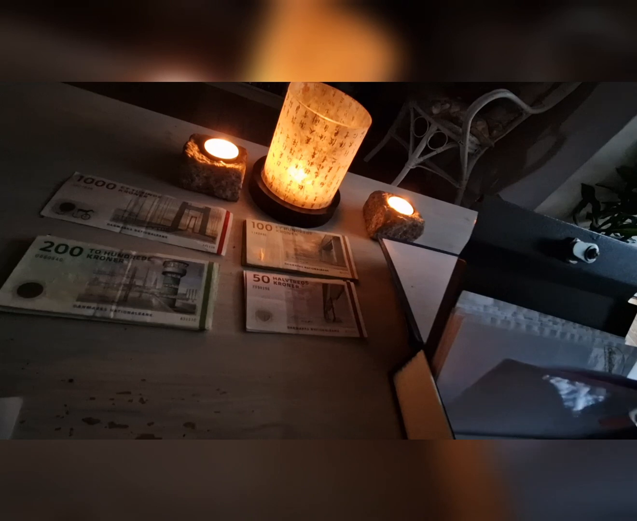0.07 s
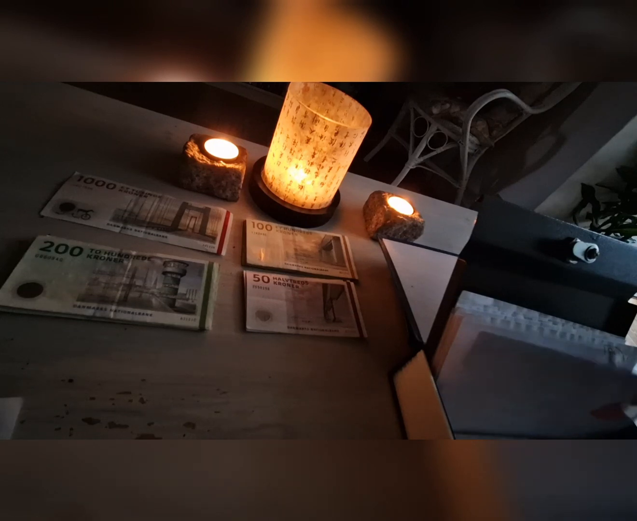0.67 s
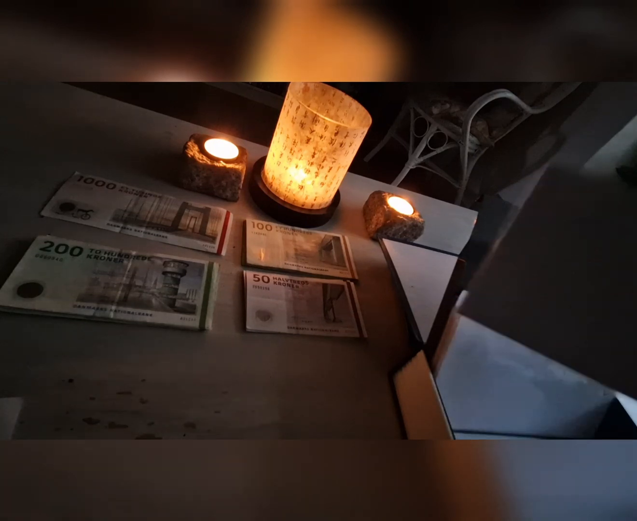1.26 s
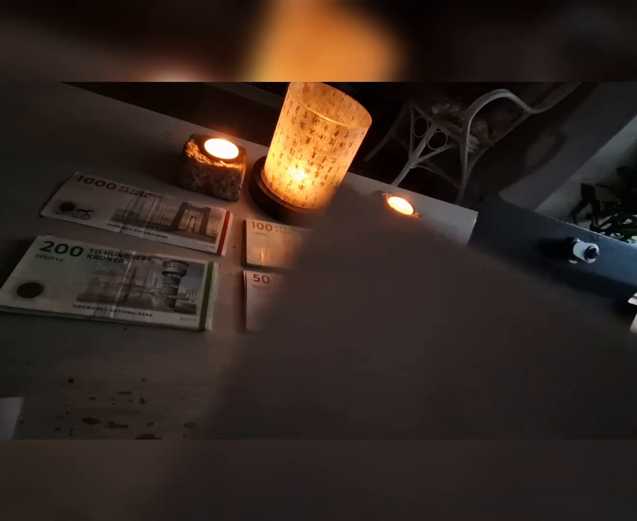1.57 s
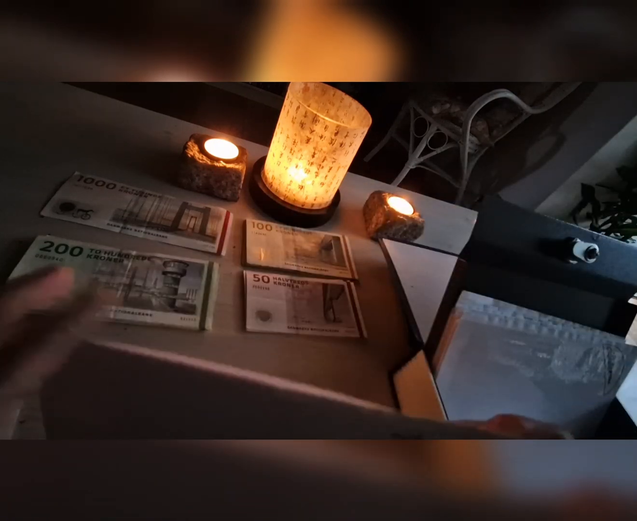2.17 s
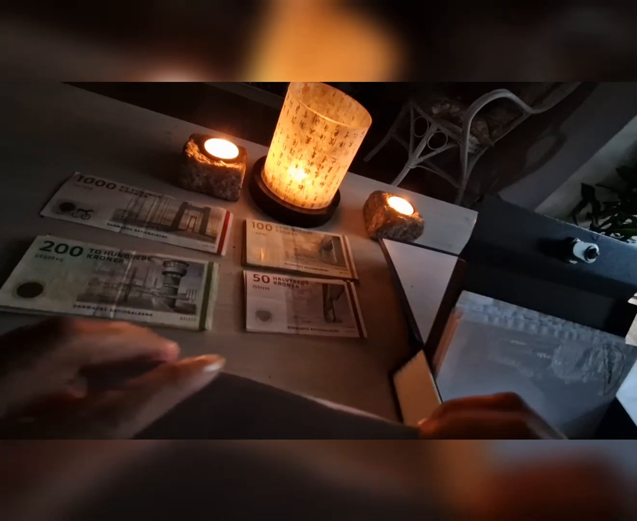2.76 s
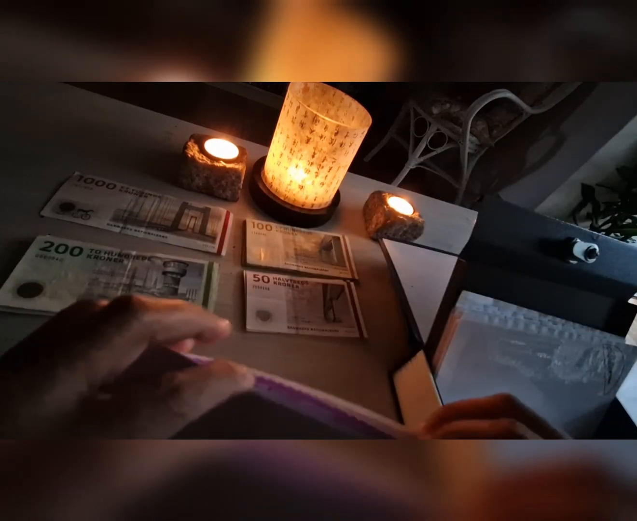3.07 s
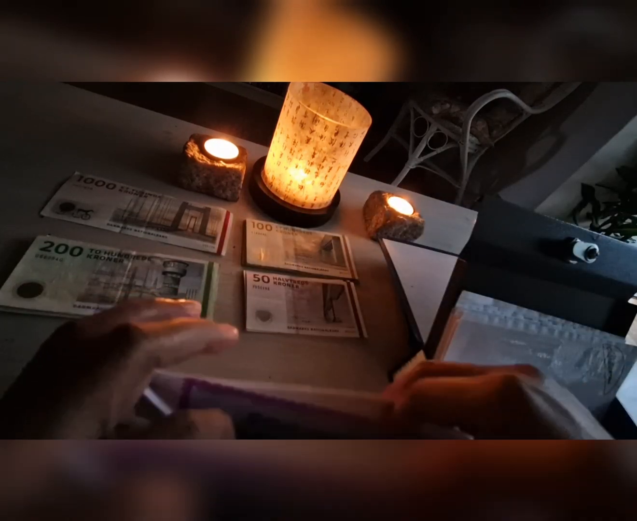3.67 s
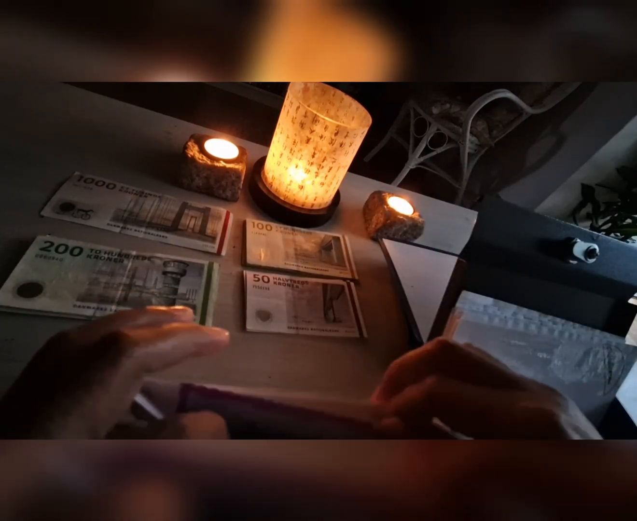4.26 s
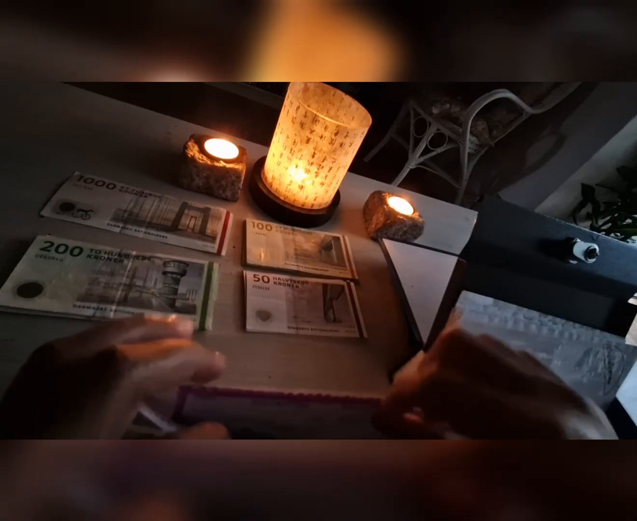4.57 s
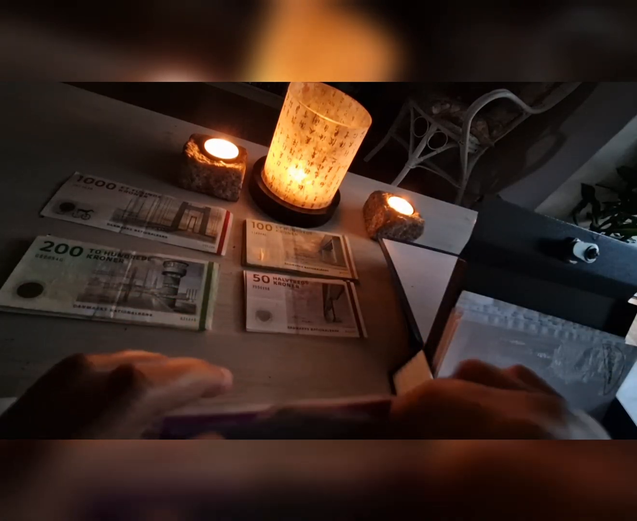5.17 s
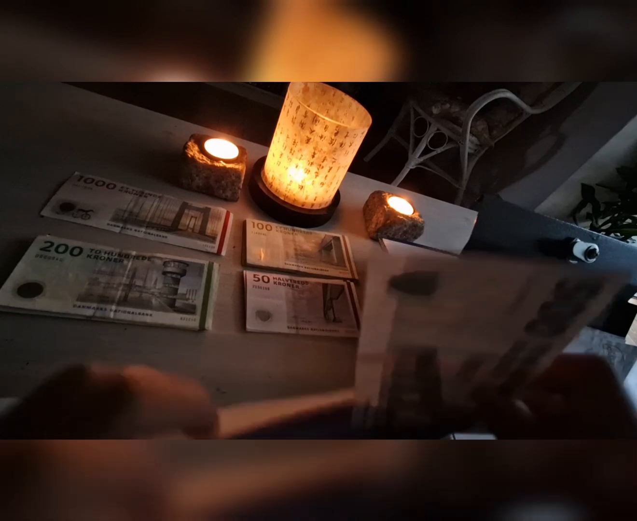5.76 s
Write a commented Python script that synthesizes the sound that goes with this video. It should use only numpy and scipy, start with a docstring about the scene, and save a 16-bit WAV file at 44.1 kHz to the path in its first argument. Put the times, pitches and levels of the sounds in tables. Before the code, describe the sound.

Soft, close paper rustles and dull taps in a quiet room as an envelope is opened and a banknote slides out.

```python
"""In a small, quiet room, close to a pair of microphones, hands work a paper envelope out of a
cardboard box: paper hisses in tiny slips, creases snap and the envelope knocks the box into ringing.
After two seconds it is laid on a wooden table with a few dull, ringing taps and smoothed. Around three
seconds the flap rustles open with thin squeaks, and from four seconds fingers feel for a banknote.
Just after five, one long, crackling pull draws it out as the envelope hums; a last soft tap follows."""
import sys
import numpy as np
from scipy import signal
from scipy.fft import rfft, irfft, next_fast_len
from scipy.io import wavfile

SR = 44100
rng = np.random.default_rng(int(sys.argv[2]) if len(sys.argv) > 2 else 0)


def transcribe(signal):
    """Save signal, clipped to [-1, 1], as a 16-bit WAV file at the path in sys.argv[1]."""
    frames = np.atleast_2d(signal).T
    limited = np.clip(frames, -1, 1)
    pcm = np.round(limited * 32767).astype(np.int16)
    wavfile.write(sys.argv[1], SR, pcm)


N = 261153

# Room tone. Each row: frequency in Hz, relative level in dB.
RUMBLE_COLOUR = [(12, -42.5), (24, -7), (50, -2.5), (80, -9.5), (110, -21.5), (200, -20.5), (350, -24.5),
                 (500, -32), (1000, -33.5), (3000, -39.5), (6500, -48.5), (10000, -59), (16000, -76)]
# Soft peaks in the microphones' own hiss. Each row: centre in Hz, width in Hz, relative level in dB.
HISS_PEAKS = [(9600, 1100, 1), (13000, 6000, -15)]
# Stereo image of the background, then of close sounds. Each row: frequency in Hz, likeness from 0 to 1.
QUIET_LIKENESS = [(60, 1), (130, 0.71), (290, 0.56), (640, 0.072), (1400, 0)]
NEAR_LIKENESS = [(100, 1), (300, 0.98), (640, 0.66), (1400, 0.78), (2300, 0.68), (3100, 0.77), (4500, 0.59),
                 (15000, 0.093)]
# Strokes of paper on paper. Each row: start, attack and hold in seconds, relative levels of sheet
# flutter, drag and fibre hiss in dB, how freely the sheet bends from 0 to 1.
STROKES = [ (0.0, 0.0019, 0.028, -63.5, -61.5, -60, 0.5), (0.03, 0.042, 0.2, -76, -73.5, -75.5, 0.3),
           (0.261, 0.04, .015, -71.5, -85, -71.5, .2), (0.472, 0.14, 0.016, -69, -75, -68.5, 0.33),
           (0.652, 0.0079, 0.011, -47.5, -52.5, -46.5, .3), (.70, 0.011, 0.024, -49.5, -44, -49.5, 0.47),
           (0.748, 0.0047, 0.031, -40, -40, -44.5, 0.67), (0.808, 0.036, .05, -64, -54, -70, 0.2),
           (0.955, 0.019, 0.034, -54, -51.5, -46, 0.6), (1.01, 0.012, 0.01, -45.5, -46, -41.5, 0.6),
           (1.04, 0.019, 0.047, -61.5, -59, -63, 0.33), (1.161, .035, 0.0072, -61.5, -80.5, -59.5, 0.54),
           (2.052, 0.066, 0.024, -77.5, -71.5, -73.5, 0.6), (2.321, .025, 0.15, -70, -64.5, -64.5, 1),
           (2.479, 0.017, 0.013, -55, -54.5, -45.5, 0.98), (2.554, 0.041, 0.032, -62, -64, -57.5, .8),
           (2.659, 0.0086, 0.023, -59, -43, -61, 1), (2.75, 0.093, 0.1, -76, -71, -74.5, .9),
           (2.951, 0.0081, 0.0092, -57, -53, -60.5, 0.54), (2.968, 0.053, 0.25, -59, -61, -67, 0.73),
           (3.128, 0.025, 0.032, -55, -51, -53.5, 0.46), (3.294, 0.0062, 0.025, -57.5, -49.5, -63.5, 0.55),
           (3.356, 0.054, 0.049, -63, -74, -69, 0.9), (3.455, 0.034, 0.18, -54.5, -67.5, -57.5, 0.82),
           (3.578, 0.08, 0.022, -54.5, -75, -56, .3), (3.662, 0.0068, 0.1, -55, -51, -65.5, .3),
           (3.768, 0.028, .19, -61.5, -62.5, -68, 0.6), (3.912, 0.017, 0.026, -60, -54, -71, 0.32),
           (4.004, 0.074, 0.1, -58, -71, -62.5, 0.77), (4.214, 0.058, 0.031, -64, -74, -72, 0.6),
           (4.369, .034, 0.013, -50.5, -57, -58.5, 0.23), (4.417, 0.079, 0.0092, -49.5, -56, -54.5, 0.43),
           (4.532, 0.068, .08, -62.5, -70, -74, .3), (4.65, 0.019, 0.009, -51, -57, -58, 0.33),
           (4.691, 0.016, 0.026, -50, -55.5, -54.5, 0.4), (4.766, 0.024, 0.28, -50, -56.5, -54.5, 0.31),
           (4.853, 0.065, 0.019, -46, -60, -64, 0.18), (5.753, 0.074, 0.11, -52, -56.5, -51.5, 0.77)]
# Where the hands are. Each row: time in seconds, pan in dB (every pan is left minus right).
HAND_PAN = [(0, 1.5), (1.05, -4), (2.2, 3), (2.5, 4.5), (3.2, 3), (3.65, 2), (4.1, 4), (4.8, 3.5),
            (5.35, 3), (5.9, 1)]
# Resonances of the half-open envelope on its support, of a pinched sheet and of a freely bending one.
# Each row: centre in Hz, width in Hz, relative level in dB.
DRAG_PEAKS = [(162, 90, -9.5), (277, 88.6, -5.5), (417.5, 119, 10), (430, 250, -1), (758, 240, -3.5),
              (847, 230, 1)]
PINCHED_PEAKS = [(1347, 190, 2), (1683, 210, 3), (2198, 220, -10.5), (3080, 670, -11)]
FREE_PEAKS = [(1350, 220, -12), (1635, 394, -2), (1777, 52, -8.5), (2167, 187, 3), (2553, 330, -4),
              (2931, 470, -5.5), (3740, 1050, -9.5)]
# Colour of scratched fibres, then of a crease's snap. Each row: frequency in Hz, relative level in dB.
FIBRE_COLOUR = [(1880, -23.5), (3200, -6.5), (4410, -1.5), (4850, 1.5), (5950, -3), (6320, -4),
                (8250, -9.5), (9200, -4.5), (10000, -1.5), (11000, -8.5), (14800, -9.5), (16000, -20),
                (16300, -30.5)]
SNAP_COLOUR = [(200, 10), (1000, 10), (2000, 5), (5500, 0), (8300, -7.5), (9900, 6), (11500, -0.5),
               (16000, -2)]
# Snapping creases. Each row: start in seconds, level in dB, centre in Hz, Q, fade in seconds, pan in dB.
SNAPS = [(.0231, -48.5, 4900, 3.1, 0.0024, -4), (0.7056, -47.5, 3500, 1.3, .0028, -2),
         (0.7168, -38, 2870, 2.9, 0.0018, -5), (0.7171, -33.5, 5140, 5.8, 0.00092, -3),
         (.7173, -37.5, 12100, 1.8, 0.00063, -2.5), (0.7547, -43.5, 3530, 0.69, 0.0039, 8),
         (0.7861, -44.5, 3600, 3.9, .007, 1), (.818, -50, 4600, 1.8, 0.0024, 2),
         (0.9864, -40.5, 9100, 2.1, 0.00057, -3), (1.0245, -35.5, 10900, 1.6, 0.009, -7),
         (1.0387, -43, 6400, 1.6, 0.0022, 11), (1.325, -75.5, 4102, 2.53, .004, 3.5),
         (2.2525, -45.5, 4870, 2.35, .0015, 8), (2.2677, -56, 2970, 1.7, .0014, 0),
         (2.346, -46, 5400, 12, 0.00068, 10), (2.3465, -46.5, 10100, 6.5, 0.00055, 3),
         (2.4167, -52.5, 9800, 1, .0015, 8), (2.487, -55, 5070, 3, 0.0039, 11),
         (2.854, -56, 7300, 0.95, 0.0024, 8.5), (3.7579, -51, 1970, 3.7, 0.001, 1),
         (3.855, -56.5, 3460, .7, 0.0014, 5), (3.933, -58, 5685, 5.1, 0.0026, 1),
         (4.389, -66, 2500, 1.44, 0.0037, 3), (4.499, -37.5, 3440, 2.45, 0.0039, 6),
         (4.9167, -48.5, 2830, 0.43, 0.0013, 13.5), (4.927, -52, 2800, 0.37, 0.0011, -12),
         (5.0891, -46, 1980, 1.2, 0.0059, 5), (5.27, -43.5, 2170, 1.23, 0.00084, 9),
         (5.287, -38.5, 1960, 2.1, 0.0018, -6), (5.293, -39, 1710, 1.3, .002, 5),
         (5.3398, -38.5, 2470, 2.9, 0.00083, 1), (5.366, -35.5, 2170, 6.5, .005, 3),
         (5.371, -36, 2270, 4.1, 0.0015, 1), (5.3935, -37, 2000, 5.6, 0.0097, 1),
         (5.4172, -39, 2170, 3.7, 0.00082, -4), (5.455, -36.5, 2070, 4.9, 0.0032, 3),
         (5.4894, -41, 1840, 5.5, .0047, -1), (5.6556, -45, 2582, 1.9, 0.0018, -2)]
# Hits on the box, then on the table. Each row: start in seconds, level in dB, focus in Hz, pan in dB.
BOX_KNOCKS = [(.0234, -59, 1170, 3), (.1302, -70, 1030, 11), (.5368, -63, 404, -0.5),
              (.6585, -37.5, 1245, 3.5), (.7172, -43, 1100, -7), (.7545, -43.5, 1200, 3.5),
              (.7595, -34.5, 1000, 5), (.7655, -41.5, 1100, -2), (.773, -37, 1050, 4.5),
              (.7865, -44, 447, 0.5), (.7935, -38, 750, 1), (.909, -55.5, 830, -2)]
TABLE_TAPS = [(2.2533, -36, 208, -2.5), (2.267, -38.5, 147, -3), (2.269, -49.5, 593, 6),
              (2.3465, -52, 265, -1.5), (2.4165, -58.5, 403, 3), (2.468, -57.5, 711, 6),
              (2.501, -51.5, 151, 0), (2.6662, -35, 830, 4), (2.82, -59, 629, 7),
              (2.8555, -52.5, 88.6, 2.5), (2.88, -58.5, 585, 4), (2.9588, -54, 725, 6.5),
              (3.062, -58, 1030, 5), (3.092, -53, 127, 0), (3.165, -54.5, 165, 3), (3.2616, -43.5, 1004, 5),
              (3.3055, -50, 266, 5), (3.345, -55.5, 567, 2), (3.54, -56.5, 119.6, 3.5),
              (3.662, -50, 349.7, -2), (3.7575, -51, 556, 1), (4.404, -52.5, 595, 3),
              (4.665, -47.5, 172, 6), (4.712, -50.5, 261.7, 2), (5.024, -50, 123.5, 1),
              (5.0895, -40, 417, 1.5), (5.912, -49.5, 257.9, 2)]
# How box and table ring. Each row: frequency in Hz, relative level in dB, seconds to fall by 60 dB.
BOX_MODES = [(129.2, 0.5, 0.14), (252, -8.5, 0.11), (353, -21, 0.069), (549.4, -13.5, 0.13),
             (766, -8, 0.035), (882, -8, .08), (1023, -1, 0.024), (1180, 1.5, 0.02), (1329, 1.5, 0.043),
             (1480, -10, 0.049), (1770, -13.5, 0.033)]
TABLE_MODES = [(86, 0, 0.093), (133, 2.5, 0.15), (218, -1.5, 0.098), (304.6, 3.5, 0.037), (395, -1, 0.081),
               (461, -8.5, 0.077), (566, -16.5, 0.077), (749, -14, 0.085), (809.6, -13.5, 0.19),
               (915, -7, 0.06), (1077, 2.5, 0.014), (1340, -2, 0.011), (1359, -18, 0.085), (1920, -31, .05),
               (2140, -3, 0.017)]
# Brief narrow tones: a tap's ring, high paper squeaks and the envelope's hollow hum.
# Each row: midpoint and length in seconds, pitch and width in Hz, level in dB.
BRIEF_TONES = [(2.43, .045, 692, 111.5, -56), (2.505, .04, 4800, 980, -68), (2.512, 0.052, 798, 70, -47),
               (3.646, 0.19, 7480, 1000, -58.5), (3.941, 0.058, 5770, 1300, -53.5),
               (3.944, 0.043, 3180, 600, -56.5), (5.296, 0.074, 428, 110, -44),
               (5.399, 0.059, 450, 69.6, -39)]
# The pull on the note. Each row: time in seconds, relative levels of sheet flutter, drag and hiss in dB.
PULL = [(5.11, -51.5, -63, -56), (5.174, -51.5, -66.5, -53), (5.286, -38.5, -41.5, -42.5),
        (5.356, -47, -64, -45), (5.368, -36, -56, -42.5), (5.39, -40, -49.5, -48.5),
        (5.516, -40.5, -55, -47.5), (5.684, -47.5, -63.5, -46), (5.77, -69, -74, -67)]
# Extra push for the pull: sheet flutter, drag and hiss in dB.
PULL_BOOST_DB = [2, 5, 3]
# Slap off the table top and the things on it. Each row: left and right delay in seconds, gain.
ECHOES = [(.00092, 0.001, 0.43), (.0023, 0.0024, -0.83), (.0067, .0068, 0.26), (0.0114, .0112, -.17),
          (0.015, 0.018, 0.33)]
# The room's tail. Each row: frequency in Hz, seconds to fall by 60 dB.
ROOM_DECAY = [(150, 0.2), (400, 0.32), (1000, 0.28), (3000, 0.262), (8000, 0.086), (15000, 0.267)]

SAG_DB_PER_S, STOP_DB_PER_S = 9, 519.5  # a stroke eases off while held, then stops quickly
SETTLE_DB, SETTLE_DB_PER_S = -11, 150  # the sheet goes on settling, softer and for longer
PULL_EDGE_S = 0.024  # fade at each end of the pull
GRIP_S, FREE_S, FREE_SHARE = 4.85, 5.39, 0.93  # the note bends more freely as it leaves the envelope
RIGHT_LAG_S = .00005  # the hands are nearer the left microphone
TOP_HZ = 16200


def amp(db):
    """Decibels to gain."""
    return 10 ** (np.asarray(db) / 20)


def unit_rms(x):
    """Scales to an rms of 1."""
    return x / np.sqrt(np.mean(x ** 2) + 1e-20)


def unit_attack(x):
    """Scales each channel of a hit to an rms of 1 over its first 10 ms."""
    return x / np.sqrt(np.mean(x[:, :SR // 100] ** 2, axis=1, keepdims=True))


def curve_at(points, hz):
    """Reads a curve on a log-frequency axis."""
    f, value = np.transpose(points)
    return np.interp(np.log(hz + 1), np.log(f + 1), value)


def automation(rows, column=1):
    """One column of a time table at every sample."""
    rows = np.array(rows)
    return np.interp(np.arange(N) / SR, rows[:, 0], rows[:, column])


def pan(db):
    """Left and right gains for a level difference."""
    return amp(np.array([np.atleast_1d(db), -np.atleast_1d(db)]) / 2)


def add(mix, start_s, sound):
    """Mixes a sound in at its start time."""
    part = mix[:, round(start_s * SR):][:, :sound.shape[1]]
    part += sound[:, :part.shape[1]]


def stereo_blend(spectra, likeness):
    """Blends two unrelated spectra so the microphones agree in the bass and differ in the treble."""
    alike = np.clip(curve_at(likeness, np.linspace(0, SR / 2, spectra.shape[1])), -1, 1)
    return np.array([spectra[0], alike * spectra[0] + np.sqrt(1 - alike ** 2) * spectra[1]])


def resonances(peaks):
    """The EQ curve, in Hz and dB, of a set of broad resonances."""
    hz = np.geomspace(20, SR / 2, num=600)
    centre, width, db = np.transpose(peaks)[:, :, None]
    power = (amp(db) ** 2 / (1 + (2 * (hz - centre) / width) ** 2) ** 2).sum(0)
    return np.transpose([hz, 10 * np.log10(power)])


def coloured(noise, colour, likeness=NEAR_LIKENESS):
    """Gives two channels of noise an EQ curve and a stereo image, at an rms of 1."""
    size = next_fast_len(N)
    eq = amp(curve_at(colour, np.fft.rfftfreq(size, 1 / SR)))
    spectra = stereo_blend(rfft(noise, size), likeness) * eq
    return unit_rms(irfft(spectra, size)[:, :N])


def room_tone():
    """The bed: low room rumble and faint microphone hiss."""
    rumble = coloured(rng.standard_normal((2, N)), RUMBLE_COLOUR, QUIET_LIKENESS)
    hiss = coloured(rng.standard_normal((2, N)), resonances(HISS_PEAKS), QUIET_LIKENESS)
    return amp(-66) * rumble + amp(-86) * hiss


def friction(slips_per_s, spread_db, fade_s, smooth):
    """A grainy gain curve: random slips of uneven size over a smooth share of even rubbing."""
    sizes = amp(spread_db * np.minimum(rng.exponential(1, N), 4))
    slips = sizes * (rng.random(N) < slips_per_s / SR)
    power = signal.lfilter([1], [1, -np.exp(-1 / (fade_s * SR))], slips ** 2)
    return np.sqrt(smooth + (1 - smooth) * power / power.mean())


def stroke(attack, hold):
    """The hand gathers speed, eases off and stops; the sheet settles after it."""
    t = np.arange(SR) / SR
    held = np.clip(t - attack, 0, hold)
    after = np.maximum(t - attack - hold, 0)
    release = amp(np.maximum(-STOP_DB_PER_S * after, SETTLE_DB - SETTLE_DB_PER_S * after))
    return np.clip(t / attack, 0, 1) * amp(-SAG_DB_PER_S * held) * release


def layer_powers(sheet, drag, fibres, freedom):
    """A movement's power in the pinched sheet, the free sheet, the drag and the fibres."""
    return np.array([(1 - freedom) * sheet ** 2, freedom * sheet ** 2, drag ** 2, fibres ** 2])


def hand_gains():
    """Strokes and pull add in power and ride the faders of the four paper layers."""
    power = note_pull()
    for start, attack, hold, sheet_db, drag_db, fibre_db, freedom in STROKES:
        layers = layer_powers(amp(sheet_db), amp(drag_db), amp(fibre_db), freedom)
        add(power, start, np.outer(layers, stroke(attack, hold) ** 2))
    return np.sqrt(power)


def sliding_paper():
    """The same quick slips shake the sheet and scratch its fibres; slower ones drag on the support."""
    slips = friction(slips_per_s=1000, spread_db=3, fade_s=.0008, smooth=.4)
    judder = friction(slips_per_s=74, spread_db=4.0, fade_s=0.0059, smooth=0.32)
    drag, sway, pinched, free, fibres = rng.standard_normal((5, 2, N))
    pinched_gain, free_gain, drag_gain, fibre_gain = hand_gains()
    drag = coloured(drag * judder, resonances(DRAG_PEAKS)) * drag_gain * amp(-4.5)
    # the hands also sway the envelope: a low flutter that grows only slowly with the drag
    sway = coloured(sway * judder, resonances([(74, 58, 0)])) * drag_gain ** 0.66 * amp(-28)
    pinched = coloured(pinched * slips, resonances(PINCHED_PEAKS)) * pinched_gain
    free = coloured(free * slips, resonances(FREE_PEAKS)) * free_gain
    sheet = (pinched + free) * amp(-3.1)
    fibres = coloured(fibres * slips ** 1.15, FIBRE_COLOUR) * fibre_gain * amp(-3.5)
    return drag + sway + (sheet + fibres) * pan(automation(HAND_PAN))


def fibre_burst(fade_s, hz, q, size=4096):
    """A dying cluster of fibre slips pops through one resonance."""
    t = np.arange(size) / SR
    f = np.fft.rfftfreq(size, 1 / SR) + 1
    slips = rng.standard_normal((2, size)) * np.exp(-t / fade_s)
    crisp = stereo_blend(rfft(slips), NEAR_LIKENESS) * amp(curve_at(SNAP_COLOUR, f))
    pop = irfft(crisp / (1 + 1j * q * (f / hz - hz / f)))
    return unit_attack(pop * np.linspace(1, 0, size) ** 2)


def crease_snaps():
    """Each crease pops through at once and rings for a moment."""
    out = np.zeros((2, N))
    for start, db, hz, q, fade_s, pan_db in SNAPS:
        add(out, start, amp(db) * pan(pan_db) * fibre_burst(fade_s, hz, q))
    return out


def hits(rows, modes, octaves, scuff_db, scuff_fade_s, size=16384):
    """Each hit rings the modes around its focus frequency and scuffs the surface."""
    out = np.zeros((2, N))
    t = np.arange(size) / SR
    f, mode_db, t60 = np.transpose(modes)[:, :, None]
    for start, db, focus_hz, pan_db in rows:
        # where the hit lands sets the strength and sign of each mode
        weight = amp(mode_db + 2.5 * rng.standard_normal(f.shape))
        weight /= np.sqrt(1 + (np.log2(f / focus_hz) / octaves) ** 4)
        flip = np.pi * rng.integers(0, 2, f.shape)
        # higher modes differ more in phase between the microphones
        phase = flip + np.sqrt(f / 2500) * rng.standard_normal((2, len(f), 1))
        ring = (weight * amp(-60 * t / t60) * np.sin(2 * np.pi * f * t + phase)).sum(axis=1)
        ring = unit_attack(ring * (1 - np.exp(-t / 0.00025)))
        scuff = amp(scuff_db) * fibre_burst(scuff_fade_s, focus_hz, q=5.3, size=size)
        add(out, start, amp(db) * pan(pan_db) * unit_attack(ring + scuff))
    return out


def box_knocks():
    """The envelope bumps the cardboard, which gives a short, hollow ring."""
    return hits(BOX_KNOCKS, BOX_MODES, octaves=0.68, scuff_db=-3.5, scuff_fade_s=0.0074)


def table_taps():
    """Hands and envelope tap the table, and the wood answers with a dull ring."""
    return hits(TABLE_TAPS, TABLE_MODES, octaves=0.83, scuff_db=-4.5, scuff_fade_s=0.0078)


def brief_tones():
    """Narrow, rasping swells of noise: a tap's ring, high paper squeaks, the envelope's hollow hum."""
    out = np.zeros((2, N))
    for middle, length, hz, width_hz, db in BRIEF_TONES:
        size = int(length * SR)
        f = np.fft.rfftfreq(size, 1 / SR)
        noise = rng.standard_normal((2, SR))[:, :size]
        band = stereo_blend(rfft(noise), NEAR_LIKENESS) / (1 + (2 * (f - hz) / width_hz) ** 2)
        add(out, middle - length / 2, amp(db) * unit_rms(irfft(band, size)) * np.hanning(size))
    rasp = friction(slips_per_s=120, spread_db=-0.5, fade_s=0.0068, smooth=0.22)
    return out * pan(automation(HAND_PAN)) * rasp


def note_pull():
    """Power in the four paper layers as the note slides out, bending more freely as it goes."""
    t = np.arange(N) / SR
    inside_s = np.minimum(t - PULL[0][0], PULL[-1][0] - t)
    moving = np.clip(1 + inside_s / PULL_EDGE_S, 0, 1)
    sheet, drag, fibres = (moving * amp(automation(PULL, column) + boost_db)
                           for column, boost_db in enumerate(PULL_BOOST_DB, start=1))
    freedom = FREE_SHARE * np.clip((t - GRIP_S) / (FREE_S - GRIP_S), 0, 1)
    return layer_powers(sheet, drag, fibres, freedom)


def with_echoes(x):
    """Nearby surfaces return the sound milliseconds later and comb its spectrum."""
    out = x.copy()
    for left_s, right_s, gain in ECHOES:
        add(out, left_s, gain * x * [[1], [0]])
        add(out, right_s, gain * x * [[0], [1]])
    return out


def room_reverb(send, size=20000):
    """A diffuse tail, each band dying at its own speed."""
    hz, t, bands = signal.stft(rng.standard_normal((2, size)), SR, nperseg=256)
    decay = amp(-60 * t / curve_at(ROOM_DECAY, hz)[:, None])
    tail = signal.istft(bands * decay, SR, nperseg=256)[1]
    tail *= 1 - np.exp(-(np.arange(tail.shape[1]) / SR / 0.00563) ** 2)  # the walls answer a little later
    return signal.fftconvolve(send, tail / np.linalg.norm(tail[0]), axes=1)[:, :N]


def scene():
    """Paper, box and table up close, over a little reverb and the room tone."""
    paper = with_echoes(sliding_paper() + brief_tones()) + crease_snaps()
    bumps = box_knocks() + table_taps()
    direct = paper + bumps
    near = direct * [[1], [0]]
    add(near, RIGHT_LAG_S, direct * [[0], [1]])
    return near + room_reverb(amp(-14) * paper + amp(-13) * bumps) + room_tone()


def record(dry):
    """A steep low-pass trims the very top of the treble."""
    lowpass = signal.firwin(511, TOP_HZ, window=("kaiser", 9), fs=SR)
    return signal.oaconvolve(dry, lowpass[None], "same")


dry = scene()
out = record(dry)
transcribe(out)
```